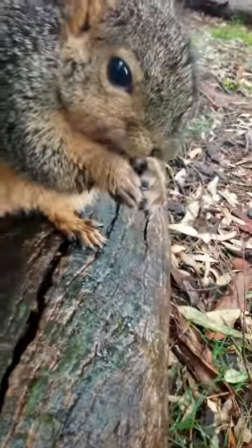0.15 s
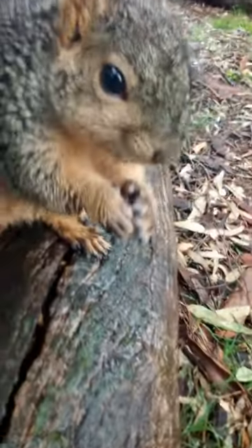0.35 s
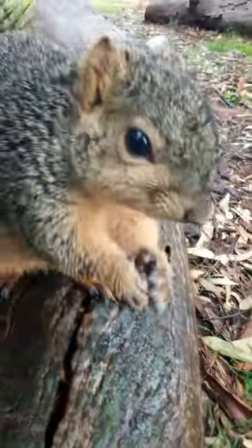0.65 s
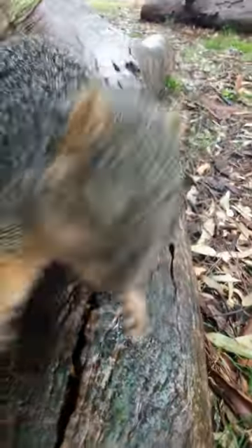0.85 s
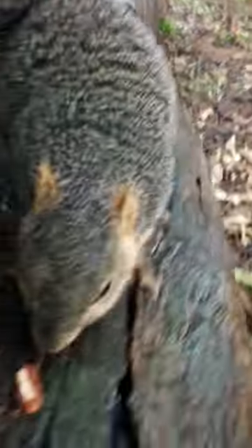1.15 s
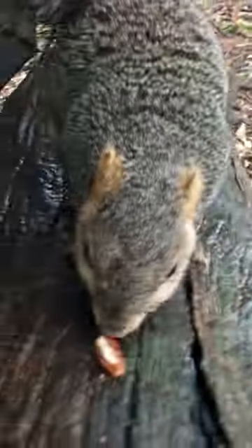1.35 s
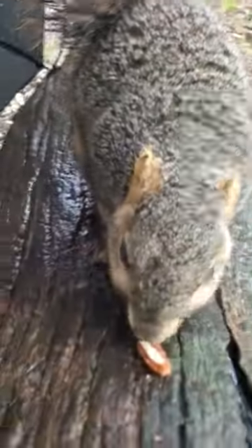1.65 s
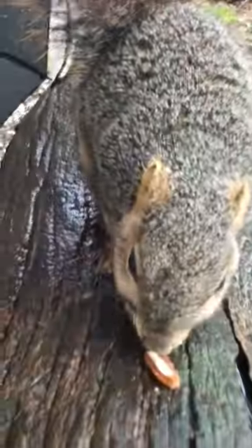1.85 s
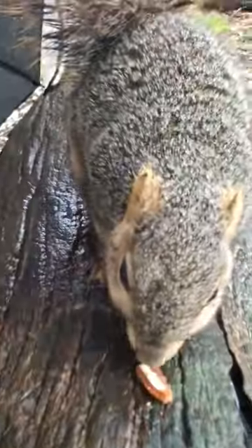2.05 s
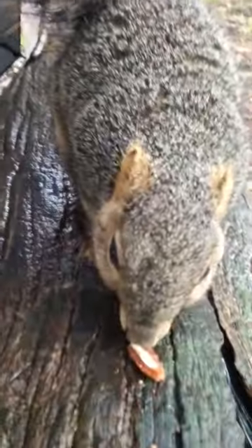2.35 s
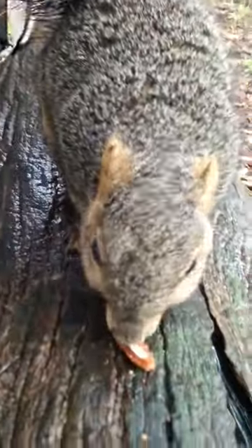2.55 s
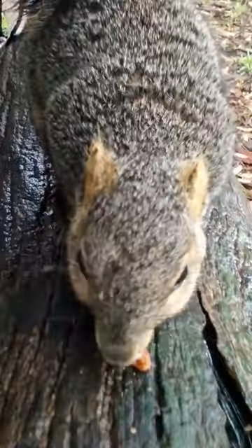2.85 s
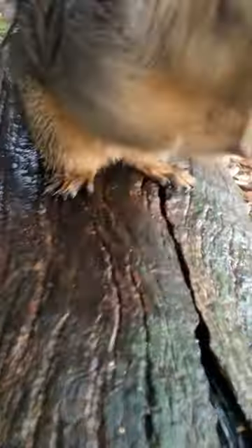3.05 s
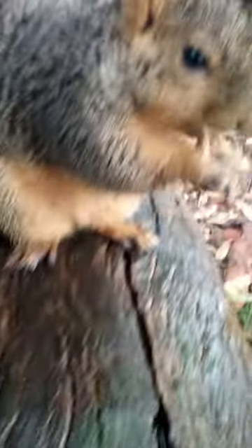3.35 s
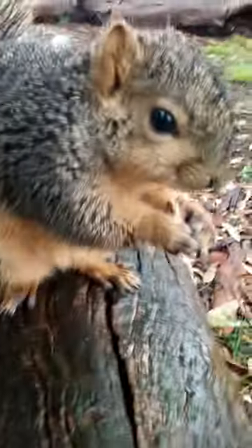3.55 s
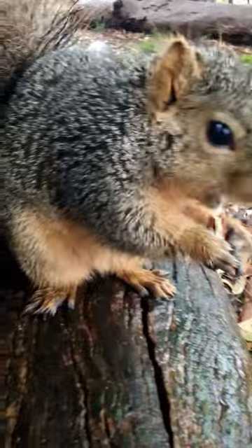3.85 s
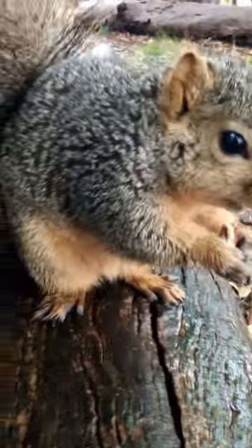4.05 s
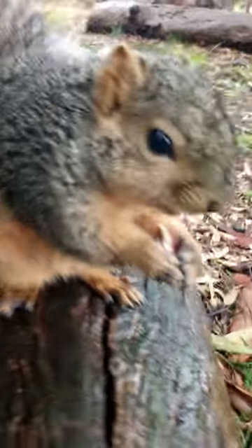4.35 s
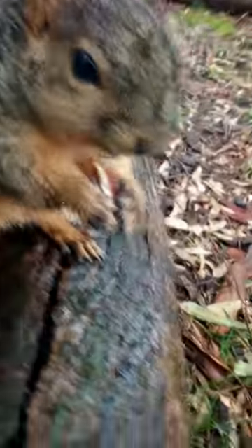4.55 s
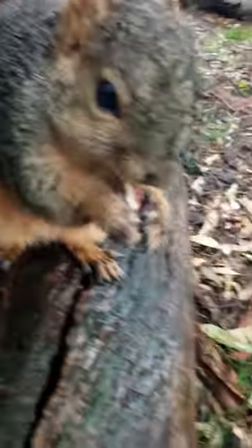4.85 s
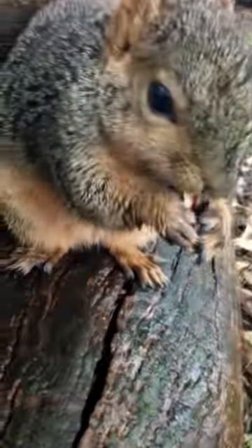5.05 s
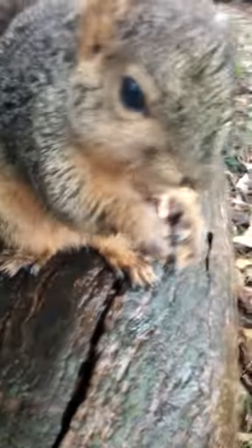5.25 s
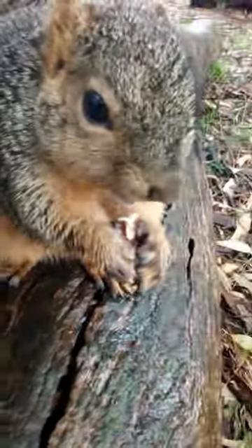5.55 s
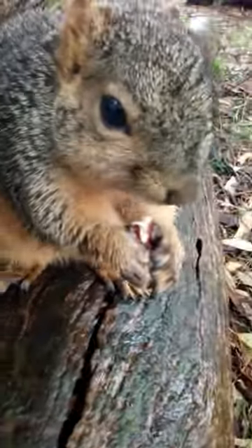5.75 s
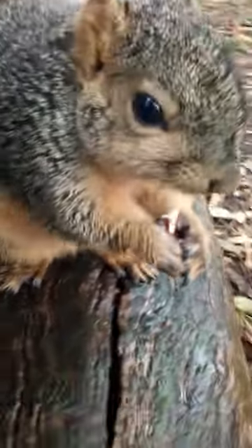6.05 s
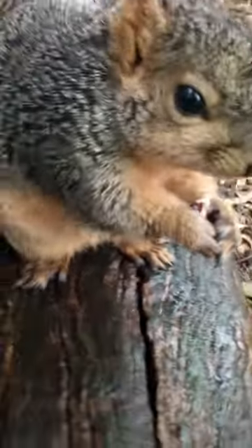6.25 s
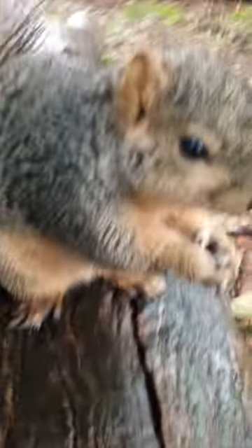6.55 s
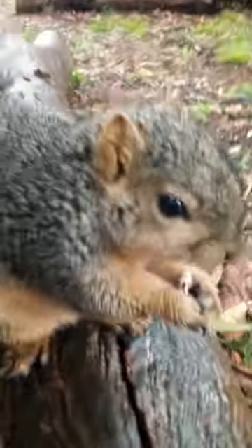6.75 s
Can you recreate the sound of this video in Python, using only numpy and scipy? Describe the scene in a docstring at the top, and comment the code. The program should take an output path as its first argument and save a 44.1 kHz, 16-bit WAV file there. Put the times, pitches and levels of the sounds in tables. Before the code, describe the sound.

A squirrel nibbles a nut on a wet log, extremely close and dry to a hand-held microphone, outdoors in quiet woodland. From 0 to 0.7 seconds come light ticks, a dull low bump at 0.34 and a sharper bite with a small knock at 0.65, while a far songbird gives a rapid sliding trill, echoing through trees. Around 1.6 to 1.7 heavy soft thumps of handling merge with hard clicks and a scrape; another crisp cluster follows at 2.0. Fine crackling gnaws fill 2.3 to 3.2. The strongest woody knock and snap lands at 3.43, another at 3.49, then a tick at 3.7. Nibbling becomes fainter, with soft scrapes near 4.8 and bright snaps at 5.12. From 5.6 the bird trills again, slower and buzzy, fading by about 6.3. A clear knock strikes at 6.16, then sparse ticks. Gentle hush, low grip rumble and faint far motors lie underneath.

```python
"""A squirrel handles and nibbles a nut on a wet log, right at the hand-held microphone.
Teeth, claws and drips are bursts in broad resonances; the log answers with knocks, the port with a high ring.
The holding hand adds low rumble and dull bumps that swing once to and fro.
Far off, a small songbird's gliding tones form two trills and single notes, mostly by way of the trees;
motors drone faintly, and shaped noise makes the hush of the wood."""
import sys
import numpy as np
from scipy import signal
from scipy.fft import rfft, irfft
from scipy.io import wavfile

SR = 44100
rng = np.random.default_rng(int(sys.argv[2]) if len(sys.argv) > 2 else 0)


def store_pcm(level_fs):
    """Save levels as 16-bit WAV."""
    pcm = np.round(np.clip(level_fs, -1, 1) * 32767).astype(np.int16)
    wavfile.write(sys.argv[1], SR, np.atleast_2d(pcm).T)


N = 304290

# The clearest nibbles, claw taps and drips, at the microphone; levels are rms over the first 5 ms.
# Each row: start in seconds, clack level in dB, tick pitch in Hz, tick level in dB, snap pitch in Hz,
# snap level in dB.
NIBBLES = [(0.078, -79, 5050, -51.5, 6350, -58.5), (0.266, -94, 3500, -60.5, 5340, -91),
           (0.529, -81, 3850, -71, 5450, -69), (0.556, -80, 3700, -57.5, 4800, -58.5),
           (0.654, -55.5, 3300, -51.5, 4990, -39.5), (0.9981, -100, 3800, -77, 6200, -65),
           (1.171, -76, 2630, -71, 6240, -74.5), (1.3264, -73, 2860, -74.5, 5640, -77),
           (1.6552, -43.5, 2850, -44, 5350, -50), (1.6554, -54, 2700, -45, 5900, -62),
           (1.6588, -69, 3120, -65, 6060, -46), (1.6722, -72, 3360, -73, 6230, -63),
           (1.679, -72, 2980, -73, 6300, -66), (1.755, -95, 2620, -60, 5170, -72),
           (1.85, -89, 2060, -65.5, 6000, -77), (1.993, -44.5, 2700, -45.5, 5906, -45.5),
           (2.002, -66, 3570, -57, 6400, -73), (2.0071, -59, 3470, -60, 6300, -72),
           (2.019, -53, 2440, -51, 5750, -48.5), (2.175, -74, 3880, -79, 5280, -72),
           (2.402, -68, 3230, -61.5, 5700, -69.5), (2.447, -76, 2740, -73.5, 5950, -71),
           (2.529, -84, 2930, -65.5, 6270, -75), (2.6114, -81, 3500, -81, 5630, -74),
           (2.7423, -75, 2860, -80, 5500, -85), (2.787, -74, 3300, -75, 5930, -73),
           (2.7951, -63.5, 3400, -60.5, 6100, -58.5), (2.9636, -91, 3530, -77, 5440, -98),
           (3.0622, -93, 3800, -82, 6040, -76.5), (3.166, -76, 3300, -81, 7040, -60.5),
           (3.1837, -95.5, 3800, -89.5, 6000, -70), (3.189, -87, 2480, -69.5, 6340, -64),
           (3.197, -75, 4500, -61.5, 5650, -62), (3.209, -85, 3360, -72, 5600, -66),
           (3.3486, -72, 3670, -88, 4860, -65.5), (3.4294, -52.5, 3570, -45.5, 6380, -39.5),
           (3.4887, -51.5, 2560, -52, 4840, -48.5), (3.4928, -67, 3000, -70, 6100, -55.5),
           (3.569, -88.5, 3130, -75, 5200, -72), (3.6172, -76.5, 3300, -75, 6010, -71),
           (3.6965, -54.5, 2880, -52, 6000, -62), (3.837, -94, 2850, -100, 6600, -63.5),
           (3.8585, -84, 3500, -93, 6540, -73), (3.9124, -81, 4100, -74, 5000, -70),
           (3.927, -72.5, 3080, -62, 6200, -59.5), (4.3406, -85, 3240, -68, 5100, -70.5),
           (4.3632, -92, 3200, -81, 5500, -79), (4.4295, -93, 4100, -80, 6240, -75),
           (4.4478, -84, 2450, -83, 6500, -65), (4.6324, -89, 3350, -80, 5970, -73),
           (4.6877, -70.5, 2950, -62, 6400, -65.5), (4.812, -95, 4000, -92, 5360, -71),
           (4.871, -104, 2690, -93, 6400, -66.5), (4.8797, -98, 3800, -80, 6260, -68),
           (4.957, -89, 3820, -85, 5770, -73), (4.977, -89, 3280, -87, 6270, -69),
           (5.022, -79, 3020, -81, 5600, -81), (5.0656, -87, 3500, -78, 6200, -73),
           (5.1002, -72, 2250, -69.5, 5430, -71), (5.1197, -85, 3850, -88.5, 5700, -42.5),
           (5.132, -84, 3830, -75, 6050, -42), (5.1477, -93, 3900, -91, 6000, -57),
           (5.161, -96, 4200, -74, 6040, -62), (5.1699, -76, 3500, -69.5, 6240, -59),
           (5.1707, -89, 3540, -71, 6300, -56.5), (5.7162, -94, 3400, -66, 5240, -72),
           (5.7218, -90, 3670, -59.5, 5850, -58), (5.835, -92, 3480, -72, 6200, -51.5),
           (6.16, -53.5, 4030, -46.5, 5900, -43.5), (6.1965, -84, 3180, -77, 6000, -74),
           (6.274, -94, 2900, -69.5, 4600, -71), (6.423, -88, 3500, -94, 6100, -78),
           (6.548, -92, 2070, -59.5, 5884, -65.5), (6.601, -75, 3400, -78, 6000, -80),
           (6.799, -95, 3830, -84, 5750, -68.5)]
CLACK_HZ, FIZZ_HZ = 1548, 10200
# The fizz on top of a snap: its level for a crisp bite (dB), and the share of the snap's swing it follows.
FIZZ_DB, FIZZ_FOLLOWS = -74, 0.694
BOUNCE_MIN_S, BOUNCE_MAX_S = 0.0003, 0.0014  # each crack returns at once off the log
# Harder contacts also knock on the wet log. Each row: start in seconds, pitch of the swing in Hz,
# lowest frequency in Hz, level in dB, pitch of the brief ring in Hz, ring level in dB.
LOG_KNOCKS = [(0.654, 383, 340, -41, 1480, -55.5), (1.657, 500, 330, -51, 1320, -52),
              (1.674, 500, 320, -68, 850, -57), (1.686, 560, 557, -57, 776, -61),
              (1.9943, 700, 292, -60.5, 1343, -53), (2.006, 513, 275, -55, 1310, -57),
              (2.795, 706, 380, -65.5, 810, -68), (3.4291, 347, 274, -31, 717, -39.5),
              (3.49, 350, 304, -45, 1520, -60), (6.1603, 644, 400, -36.5, 1370, -47.5)]
# A tooth slips on the kernel. Each row: start in seconds, pitch in Hz, level in dB.
TOOTH_SQUEAKS = [(0.5569, 3370, -64), (1.756, 2600, -66), (2.531, 2918, -67.5), (4.341, 3300, -64.5),
                 (6.55, 2060, -68)]
# Rough drags of teeth or claws. Each row: start in seconds, length in seconds, centre in Hz,
# level in dB before the common lift in scrapes().
CLAW_SCRAPES = [(0.102, 0.014, 6900, -79), (0.651, 0.0073, 7100, -59), (1.651, 0.034, 3530, -85),
                (1.652, 0.012, 5700, -57), (1.993, 0.024, 6060, -62), (2.679, 0.024, 3900, -82),
                (2.896, 0.01, 5900, -81), (3.101, 0.013, 3870, -82), (3.148, 0.088, 5300, -77),
                (3.563, 0.025, 4900, -80), (3.711, 0.017, 5470, -78), (4.331, 0.035, 3300, -84.5),
                (4.802, 0.13, 5030, -86.5), (4.97, 0.12, 5400, -83.5), (5.173, 0.015, 6100, -73)]
CRUMBS_PER_S, CRUMBS_DB = 12, -79
# Spells of busy gnawing. Each row: start in seconds, length in seconds.
GNAWING_SPELLS = [(1.2, 0.38), (2.305, 0.95), (3.5, 0.61), (4.25, 1)]
# Tiny flakes of shell and specks of water burst. Each row: start in seconds, pitch in Hz, level in dB,
# level of the microphone port's ring in dB, both before the common trim in pips().
TINY_BURSTS = [(0.0782, 12300, -72, -64), (0.5255, 11040, -81, -88), (0.5557, 11040, -65.5, -81),
               (0.9982, 11000, -74, -85), (1.346, 10050, -75.5, -93), (1.757, 12200, -78, -81),
               (2.1115, 7400, -69, -97), (2.1762, 9550, -71, -91), (2.3357, 9840, -76, -98),
               (2.4509, 11600, -82, -69), (2.4924, 12000, -82, -80), (2.528, 12400, -70.5, -88),
               (3.167, 10900, -75, -75), (3.348, 11950, -77, -74), (3.6173, 7800, -75, -83.5),
               (3.756, 7600, -73, -93), (3.8583, 8950, -74, -87), (3.9265, 10700, -74, -93),
               (4.004, 9580, -72.5, -87), (4.2798, 9460, -73.5, -91), (5.1208, 12300, -69, -67),
               (5.37, 9000, -74, -78), (5.7225, 9900, -73, -92), (5.834, 11500, -77, -85),
               (5.8906, 10300, -75, -84), (5.9694, 11100, -80, -82), (6.2736, 9800, -73, -67),
               (6.4916, 9800, -75, -71)]
# The microphone's port rings with every close click.
PORT_HZ, PORT_WIDTH, PORT_DB = 14900, 1.04, -5

# Soft bumps on the microphone's body.
# Each row: middle of the swing in seconds, peak level in dB, pitch in Hz.
BODY_BUMPS = [(0.125, -37.5, 78), (0.3405, -22, 99.3), (0.3526, -34, 71.5), (0.6645, -36.5, 83),
              (0.727, -39, 77), (1.581, -34.5, 68), (1.6327, -26.5, 113), (1.6415, -21.5, 103.7),
              (1.6656, -24, 87.4), (1.677, -28.5, 64), (1.699, -33.5, 103.5), (2.15, -47, 100),
              (3.672, -46.5, 67.3), (6.117, -40.5, 70.1)]
# Colour of the resting grip's rumble. Each row: frequency in Hz, relative level in dB per Hz.
GRIP_SPECTRUM = [(15, -27), (25, -36.5), (52, -3.5), (82, 2), (134, -3), (158, -2.5), (188, -16.5),
                 (219, -11), (321, -35.5), (400, -57), (520, -61), (880, -120)]
# The holding hand shifts. Each row: start in seconds, length in seconds before the release,
# level in dB before the ceiling and trim in grip_shifts().
HAND_SHIFTS = [(-0.01, 0.13, -44.5), (0.306, 0.18, -47.5), (0.631, 0.15, -44), (1.199, 0.015, -54.5),
               (1.565, 0.19, -28), (2.111, 0.083, -47.5), (2.724, 0.076, -52.5), (2.922, 0.12, -51.5),
               (3.253, 0.018, -50.5), (3.355, 0.075, -52.5), (3.656, 0.12, -52.5), (4.346, 0.091, -54.5),
               (4.469, 0.033, -59), (4.817, 0.073, -55.5), (5.734, 0.24, -56), (6.111, 0.086, -53),
               (6.242, 0.14, -53), (6.539, 0.075, -58.5), (6.767, 0.06, -56)]
GRIP_ATTACK_S, GRIP_RELEASE_S = 0.0085, 0.03
# The resting hand is never quite still.
GRIP_REST_DB, GRIP_TREMOR_DB, GRIP_TREMOR_HZ = -63.5, 1.5, 10.3
# Band of a firm shift; gentler ones are duller.
GRIP_LOW_HZ, GRIP_TOP_HZ, GRIP_DULLS_HZ_PER_DB = 45, 137.2, 3.5

# The far bird's single notes around its trills, before distance is applied.
# Each row: start in seconds, length in seconds, start pitch in Hz, end pitch in Hz, level in dB.
BIRD_NOTES = [(0, 0.011, 3710, 3270, -60), (0.047, 0.01, 7000, 7360, -63), (.072, 0.021, 6390, 5840, -48),
              (0.095, 0.022, 6100, 6430, -64), (.108, 0.02, 4690, 3640, -69.5),
              (.660, 0.018, 3050, 2910, -67.5), (.712, 0.035, 4975, 4940, -62),
              (.748, 0.028, 4736, 4100, -73), (.764, 0.0276, 3970, 3790, -65),
              (.81, 0.045, 3568, 2720, -72.5), (.79, 0.038, 4960, 4910, -72),
              (.878, 0.044, 5020, 4940, -69), (.908, 0.019, 4730, 3950, -66.5),
              (.924, 0.041, 3927, 3800, -64.5), (.975, 0.042, 3500, 2900, -75.5),
              (1.044, 0.059, 2640, 2690, -75.5), (1.7, 0.034, 5300, 5490, -65),
              (1.73, 0.05, 5500, 4540, -77), (3.22, 0.047, 5260, 5000, -83.5),
              (3.33, 0.078, 4860, 5200, -83), (5.238, 0.035, 4420, 3640, -70),
              (5.25, 0.028, 5200, 4840, -74), (5.286, 0.048, 3880, 3740, -68.5),
              (5.36, 0.032, 3610, 3790, -68), (5.444, 0.016, 7060, 6840, -61),
              (5.498, 0.018, 5170, 4970, -74), (5.515, 0.03, 4370, 4650, -69),
              (5.522, .02, 3680, 3770, -72), (5.585, 0.026, 6546, 6275, -68),
              (5.716, 0.028, 5900, 5980, -56.5), (5.96, 0.022, 4710, 4560, -72),
              (6.082, 0.0322, 4520, 4750, -64.5), (6.265, 0.027, 4640, 4450, -68),
              (6.353, 0.072, 2860, 2910, -76), (6.825, 0.041, 5313, 4900, -76)]
# Contours of the clean and the rough trill syllable, before limits and chance variation.
# Each row: seconds from the syllable's start, pitch in Hz, relative level in dB.
SWOOP_CONTOUR = [(0, 3700, -10), (.008, 4350, -7), (.015, 4750, -4), (.0185, 5050, 6), (.022, 5450, -3),
                 (.027, 6200, 0.5), (.034, 6350, -11), (.042, 5800, -5.5), (.054, 4700, -11.5),
                 (.066, 3900, -3), (.072, 3600, -13)]
BUZZ_CONTOUR = [(0, 6450, 3), (.007, 5010, -2.5), (.013, 6170, -1), (.02, 4940, -10), (.027, 6300, -3.5),
                (.034, 5020, -5.5), (.043, 5700, -13), (.05, 4940, -10.5), (.055, 4450, -13),
                (.064, 4550, -7), (.071, 3830, -11.5), (.086, 3030, -6)]
SYLLABLE_PITCH_SPREAD, SYLLABLE_SPREAD_DB = 0.013, 1.5  # no two syllables are quite alike
BIRD_DIRECT_DB, BIRD_ECHO_DB = -9.5, -3.2

# Far motors droning for a while.
# Each row: start in seconds, length in seconds, start pitch in Hz, end pitch in Hz, level in dB.
FAR_MOTORS = [(.7, 5, 214.1, 211.4, -77), (2.85, 0.93, 119.2, 130.9, -65.5),
              (4.15, 0.47, 127.6, 116.7, -66), (4.8, 1.26, 150.7, 148.5, -67.5),
              (5.42, 0.187, 146.1, 149.7, -60), (6.15, 1, 114.8, 110.8, -66)]
# Hush of the wood with the microphone's own hiss. Each row: frequency in Hz, relative level in dB per Hz.
HUSH_SPECTRUM = [(150, -12), (250, 2), (576, -7.5), (735, -6.5), (1380, -14.5), (1670, -15), (2960, -20),
                 (4190, -21.5), (6700, -20), (8100, -35.5), (10200, -36.5), (13800, -42), (14900, -28.5),
                 (16000, -34.5)]
# Swell of the hush, followed only in part. Each row: time in seconds, level in dB.
HUSH_LEVELS = [(0.0, -76), (0.71, -80), (1.65, -75.5), (2.19, -79.5), (2.5, -74), (2.86, -79.5),
               (3.27, -77), (3.69, -81.5), (4.44, -77.5), (5.21, -77.5), (6.01, -81), (6.42, -80),
               (6.9, -79)]
CUTOFF_HZ = 16000


def from_db(db):
    """Decibels to gain."""
    return 10 ** (np.asarray(db) / 20)


def rms_one(x):
    """Scale to an rms of one."""
    return x / np.sqrt(np.mean(x ** 2) + 1e-20)


def add(out, s, sound):
    """Mix a sound in at a given time."""
    at = int(np.clip(round(s * SR), 0, N - 1))
    out[at:at + len(sound)] += sound[:N - at]


def band(x, low_hz, high_hz, order=2):
    """Causal band-pass."""
    return signal.sosfilt(signal.butter(order, [low_hz, high_hz], "band", fs=SR, output="sos"), x + 1e-18)


def coloured(spectrum):
    """Noise with the given spectrum, falling away outside it; rms 1."""
    hz, db = np.transpose(spectrum)
    f = np.maximum(np.fft.rfftfreq(N, 1 / SR), 1)
    skirts = np.minimum(f / hz[0], 1) ** 2 * np.minimum(hz[-1] / f, 1) ** 4
    gain = from_db(np.interp(np.log(f), np.log(hz), db))
    return rms_one(irfft(rfft(rng.standard_normal(N)) * skirts * gain, N))


def slow_chance(rate):
    """Smooth random wavering, up to the given rate in Hz; spread 1."""
    return rms_one(band(rng.standard_normal(N + SR), rate / 4, rate)[SR:])


def scatter(t, t60):
    """Dying noise of unit energy: many tiny fractures and reflections."""
    tail = rng.standard_normal(len(t)) * from_db(-60 * t / t60)
    return tail / np.linalg.norm(tail)


def ticks(crisp_db=-46, crumble=0.3, grate_db=-24):
    """Hard bites crack over a wide band; light touches crumble and ring at a clearer pitch."""
    out = np.zeros(N)
    for s, clack_db, tick_hz, tick_db, snap_hz, snap_db in NIBBLES:
        soft_db = crumble * max(crisp_db - max(clack_db, tick_db, snap_db), 0)
        tick_width = 1 + 0.35 * from_db(-soft_db)
        lead_db = grate_db + soft_db
        fizz_db = FIZZ_DB + FIZZ_FOLLOWS * (snap_db - crisp_db)
        # Each resonance: pitch Hz, width ratio, level dB, crumble of a hard bite dB, decay s.
        resonances = [(CLACK_HZ, 1.33, clack_db, -6.5, 0.072),
                      (tick_hz, tick_width, tick_db, -4.5, 0.047),
                      (snap_hz, 1.146, snap_db, -6.5, 0.034),
                      (FIZZ_HZ, 1.25, fizz_db, 8.0, 0.025)]
        for hz, width, level_db, crumble_db, t60 in resonances:
            add(out, *contact(s, hz, width, level_db, soft_db + crumble_db, t60, lead_db))
    return out


def contact(s, hz, width, level_db, scatter_db, t60, grate_db, rise_s=0.00022):
    """A faint grating, then a crack and a short crumble, in one broad resonance; level over the first 5 ms."""
    t, first = np.arange(SR // 16) / SR, SR // 200
    low_hz, high_hz = hz / width, hz * width
    force = from_db(scatter_db) * scatter(t, t60) * np.minimum(t / rise_s, 1)
    force[0] -= 1
    force[int(rng.uniform(BOUNCE_MIN_S, BOUNCE_MAX_S) * SR)] -= 1  # the bounce is as strong as the crack
    ring = band(force, low_hz, high_hz, order=3)
    ring = ring / np.sqrt(np.mean(ring[:first] ** 2))
    grate = rms_one(band(rng.standard_normal(2 * first), low_hz, high_hz, order=3))
    grate = from_db(grate_db) * grate * np.linspace(0, 1, 2 * first)
    return s - 2 * first / SR, from_db(level_db) * np.concatenate([grate, ring])


def knocks(scatter_db=-14.0, t60=0.047, rise_s=0.0018, ring_width=1.123, ring_t60=0.021):
    """Wet wood swings once to and fro, shudders faintly and rings at the spot's pitch; level over 5 ms."""
    out, lead = np.zeros(N), SR // 500
    t = np.arange(SR // 12) / SR
    for s, hz, low_hz, level_db, ring_hz, ring_db in LOG_KNOCKS:
        force = from_db(scatter_db) * scatter(t, t60) * np.minimum(t / rise_s, 1)
        force[0] += 1
        angle = 2 * np.pi * hz * np.arange(-lead, lead) / SR
        swing = angle * np.exp(-angle ** 2 / 2)
        knock = band(np.convolve(force, swing), low_hz, 4200, order=5)
        knock = knock / np.sqrt(np.sum(knock ** 2) / (SR // 200))
        add(out, s - lead / SR, from_db(level_db) * knock)
        ring_s = s - lead / SR / 2
        add(out, *contact(ring_s, ring_hz, ring_width, ring_db, scatter_db=-12, t60=ring_t60, grate_db=-28))
    return out


def squeaks(width=1.071, t60=0.05):
    """Each slip of a tooth rings for a moment in one narrow resonance."""
    out = np.zeros(N)
    for s, hz, db in TOOTH_SQUEAKS:
        add(out, *contact(s, hz, width, db, scatter_db=9.5, t60=t60, grate_db=-7))
    return out


def scrapes(width=1.29, grain_db=13.0, lift_db=3.5):
    """A tooth or claw drags over the shell or bark: a short run of uneven grains."""
    out = np.zeros(N)
    for s, length, hz, db in CLAW_SCRAPES:
        white, size = rng.standard_normal((2, SR // 10))[:, :int(length * SR)] if length < 0.1 \
            else rng.standard_normal((2, SR // 10))
        grains = band(white * from_db(grain_db * size), hz / width, hz * width, order=3)
        drag = rms_one(grains * signal.windows.tukey(len(grains), 0.5))
        add(out, s, from_db(db + lift_db) * drag)
    return out


def crumbs(per_s, level_db, spread_db, low_hz, high_hz, width):
    """Light touches at random: short dry ticks, most near the faintest, each at a pitch of its own."""
    out = np.zeros(N)
    for when, size, pitch in rng.random((int(per_s * N / SR), 3)):
        hz = low_hz + (high_hz - low_hz) * pitch
        db = level_db + spread_db * size ** 2
        add(out, *contact(when * N / SR, hz, width, db, scatter_db=-3.0, t60=0.027, grate_db=-17.0))
    return out


def crackle(idle_per_s=14, busy_per_s=60, level_db=-63, spread_db=11, low_hz=2600, high_hz=7200):
    """Fine splinters of the nut give way in single dry clicks; they crowd while the squirrel gnaws."""
    t, rate = np.arange(N) / SR, np.full(N, float(idle_per_s))
    for s, length in GNAWING_SPELLS:
        rate[(t > s) & (t < s + length)] = busy_per_s
    chance, size, sign = rng.random((3, N))
    clicks = (chance < rate / SR) * from_db(level_db + spread_db * size ** 2) * np.sign(sign - 0.5)
    return band(clicks, low_hz, high_hz)


def pips(trim_db=-3.5, width=1.058, t60=0.033):
    """Each tiny burst rings at its own pitch and sets the microphone's port ringing."""
    out = np.zeros(N)
    for s, hz, db, port_db in TINY_BURSTS:
        add(out, *contact(s, hz, width, db + trim_db, scatter_db=-2.0, t60=t60, grate_db=-12))
        add(out, *contact(s, PORT_HZ, PORT_WIDTH, port_db + trim_db, scatter_db=6.0, t60=t60, grate_db=-33.5))
    return out


def handling(low_cut_hz=36):
    """Grip rumble, and bumps that swing the microphone once to and fro and die at once."""
    rest = from_db(GRIP_REST_DB + GRIP_TREMOR_DB * slow_chance(GRIP_TREMOR_HZ)) * coloured(GRIP_SPECTRUM)
    out = rest + grip_shifts()
    t = np.arange(-SR // 20, SR // 20) / SR
    low_cut = signal.butter(2, low_cut_hz, "high", fs=SR, output="sos")
    for s, peak_db, hz in BODY_BUMPS:
        angle = 2 * np.pi * hz * t
        bump = signal.sosfiltfilt(low_cut, angle * np.exp(-angle ** 2 / 2))
        add(out, s + t[0], from_db(peak_db) * bump / np.abs(bump).max())
    return out


def grip_shifts(firm_db=-45, trim_db=-3.5):
    """Each shift of the hand swells, holds and dies as a low rumble, duller the gentler it is."""
    out = np.zeros(N)
    for s, length, db in HAND_SHIFTS:
        t = np.arange(int((length + GRIP_RELEASE_S) * SR)) / SR
        gentle_db = max(firm_db - db, 0)  # shifts above firm_db are held to it
        top_hz = GRIP_TOP_HZ - GRIP_DULLS_HZ_PER_DB * gentle_db
        rumble = band(rng.standard_normal(SR), GRIP_LOW_HZ, top_hz, order=3)[SR // 2:][:len(t)]
        attack = np.minimum(t / GRIP_ATTACK_S, 1)
        release = np.minimum((t[-1] - t) / (2 * GRIP_RELEASE_S), 1)
        add(out, s, from_db(firm_db - gentle_db + trim_db) * rms_one(rumble * attack * release))
    return out


def songbird():
    """Single whistled notes, with one fast trill of clean swoops and one of rough buzzes."""
    swoops = trill(SWOOP_CONTOUR, start_s=0.1365, period_s=0.0728, count=7, level_db=-59, fade_db=4.0,
                   crest=0.07, top_hz=6410, end_top_hz=5760, waver=0.008)
    buzzes = trill(BUZZ_CONTOUR, start_s=5.587, period_s=0.1295, count=6, level_db=-55, fade_db=24.0,
                   crest=0.23, top_hz=6380, end_top_hz=5820, waver=0.022)
    return glides(BIRD_NOTES, flutter_db=3.5, waver=0.015, waver_hz=148) + swoops + buzzes


def trill(syllable, start_s, period_s, count, level_db, fade_db, crest, top_hz, end_top_hz, waver):
    """One syllable at an even pace; level peaks a share of the way in (crest) and the pitch ceiling sinks."""
    out, (s, hz, db) = np.zeros(N), np.transpose(syllable)
    for k, spent in enumerate(np.linspace(0, 1, count)):
        off_pitch, off_level = rng.standard_normal((2, len(s)))
        reached = np.minimum(hz, top_hz + (end_top_hz - top_hz) * spent ** 0.54)
        pitch = reached * (1 + SYLLABLE_PITCH_SPREAD * off_pitch)
        shape = np.transpose([s, pitch, db + SYLLABLE_SPREAD_DB * off_level])
        gain = from_db(level_db - fade_db * (spent - crest) ** 2)
        add(out, start_s + k * period_s, gain * whistle(shape, waver=waver, flutter_db=0.5))
    return out


def glides(rows, flutter_db, waver, waver_hz):
    """Tones that slide from one pitch to another."""
    out = np.zeros(N)
    for s, length, start_hz, end_hz, level_db in rows:
        shape = [(0, start_hz, level_db), (length, end_hz, level_db)]
        add(out, s, whistle(shape, waver, waver_hz, flutter_db))
    return out


def whistle(shape, waver=0.021, waver_hz=110, flutter_db=1.0):
    """A pure tone along a contour of (s, Hz, dB), with soft ends, wavering in pitch and strength."""
    s, hz, db = np.transpose(shape)
    t = np.arange(int(s[-1] * SR)) / SR
    steps = np.arange(N // 100)  # random points, two to each cycle of waver_hz
    wander, flutter = (np.interp(t * waver_hz * 2, steps, row) for row in rng.standard_normal((2, N // 100)))
    pitch = np.interp(t, s, hz) * (1 + waver * wander)
    gain = from_db(np.interp(t, s, db)) * rms_one(from_db(flutter_db * flutter))
    tone = np.sqrt(2) * np.sin(2 * np.pi * np.cumsum(pitch) / SR)
    return tone * gain * signal.windows.tukey(len(t), 0.25)


def trees(x, near_t60=0.12, far_t60=0.6, far_db=-5, clump_s=0.022, clump_db=-5):
    """Trunks and leaves scatter sound: a quick dense tail, a second wave from a clump, a fainter long tail."""
    t = np.arange(SR) / SR
    echoes = scatter(t, near_t60) + from_db(far_db) * scatter(t, far_t60)
    echoes *= np.minimum(t / 0.0029, 1)
    echoes += from_db(clump_db) * np.interp(t - clump_s, t, scatter(t, near_t60 / 2), left=0)
    return signal.fftconvolve(x, echoes)[:N]


def motors():
    """Far motors drone as low, slowly sliding tones of wavering pitch and strength."""
    return glides(FAR_MOTORS, flutter_db=3.5, waver=0.019, waver_hz=111.5)


def hush(level_db=-74, follow=0.48, waver_db=1.13):
    """Distant air in the trees as shaped noise, swelling a little."""
    swell = np.interp(np.arange(N) / SR, *np.transpose(HUSH_LEVELS))
    swell_db = follow * (swell - np.median(swell))
    return from_db(level_db + swell_db + waver_db * slow_chance(9.25)) * coloured(HUSH_SPECTRUM)


def scene(close_echo_db=-24):
    """The squirrel is close and dry; the bird arrives mostly by way of the trees."""
    touches = crumbs(CRUMBS_PER_S, CRUMBS_DB, spread_db=3.0, low_hz=2230, high_hz=6750, width=1.38)
    close = ticks() + knocks() + squeaks() + scrapes() + touches + crackle()
    port_ring = band(close, PORT_HZ / PORT_WIDTH, PORT_HZ * PORT_WIDTH, order=1)
    close = close + from_db(PORT_DB) * port_ring + pips()
    bird = songbird()
    far = from_db(BIRD_DIRECT_DB) * bird + from_db(BIRD_ECHO_DB) * trees(bird) + motors()
    return (close + from_db(close_echo_db) * trees(close) + handling() + far + hush())[None]


def record(dry):
    """The top is cut steeply."""
    return signal.sosfilt(signal.ellip(10, 0.2, 70, CUTOFF_HZ, fs=SR, output="sos"), dry)


dry = scene()
out = record(dry)
store_pcm(out)
```